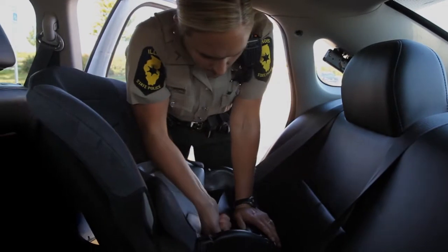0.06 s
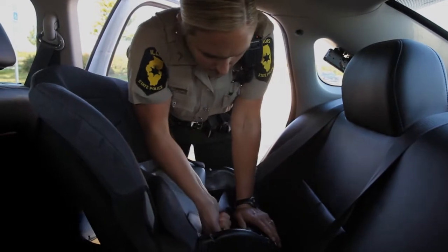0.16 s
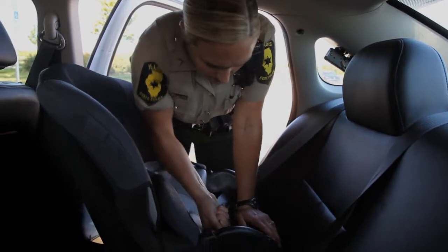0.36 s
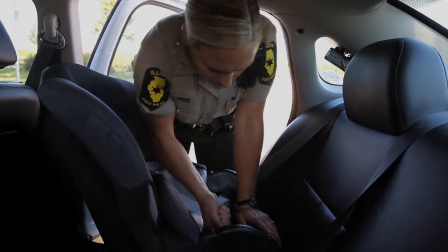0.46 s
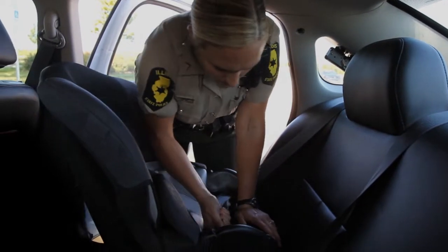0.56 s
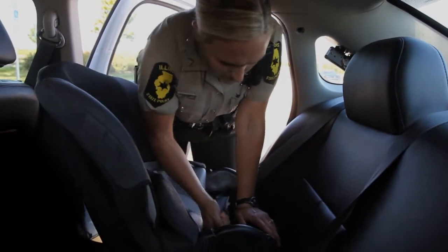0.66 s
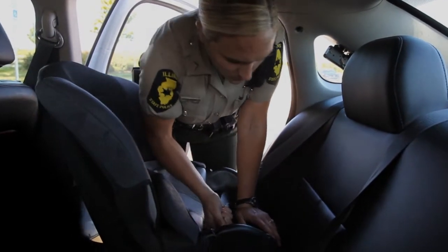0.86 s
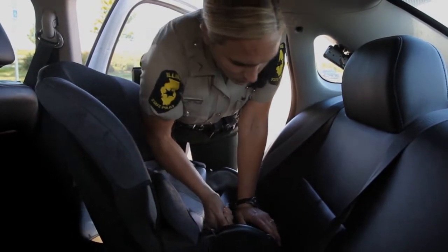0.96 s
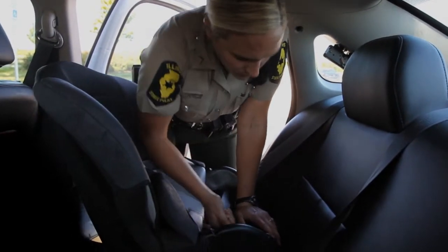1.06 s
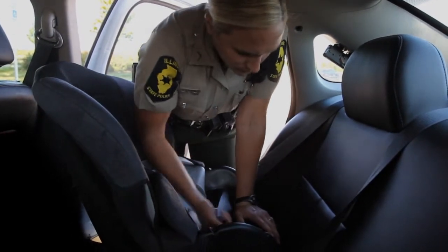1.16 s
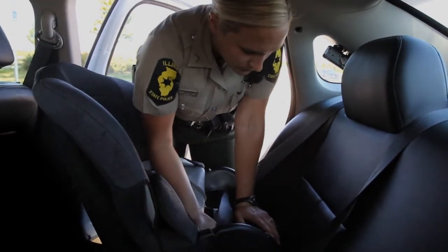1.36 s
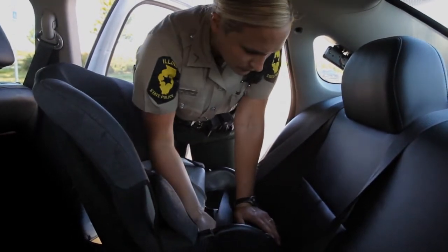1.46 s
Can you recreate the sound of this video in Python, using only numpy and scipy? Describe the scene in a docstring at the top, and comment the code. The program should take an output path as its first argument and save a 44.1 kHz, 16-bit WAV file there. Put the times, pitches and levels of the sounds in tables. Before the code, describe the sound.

A latch snaps shut with one loud, sharp click at about 0.25 seconds, just after soft strap rustling and a small tick. The close click dies quickly in the car's cabin. Faint clinks follow over a low outdoor hush. Handling returns around 1 second, the child seat's plastic shell knocks twice near 1.2 seconds, and light buckle clinks and rubbing continue until 1.5 seconds.

```python
"""Inside a parked car, door open, one microphone close to a child seat. Hands push the seat's latch
until it ticks and snaps shut with a loud click. Straps rustle and scrape, buckle parts clink, and
later the plastic shell knocks twice; the small cabin gives short, dull tails. The snap overloads
the recorder, whose gain control ducks the outdoor hush and slowly lets it back."""
import sys
import numpy as np
from scipy import signal
from scipy.fft import rfft, irfft
from scipy.io import wavfile

SR = 44100
rng = np.random.default_rng(int(sys.argv[2]) if len(sys.argv) > 2 else 0)


def bounce(signal):
    """Save signal as a 16-bit WAV file at the path given by the first command-line argument."""
    frames = np.transpose(np.atleast_2d(signal))
    limited = np.clip(frames, -1, 1)
    pcm = np.round(limited * 32767).astype(np.int16)
    wavfile.write(sys.argv[1], SR, pcm)


N = 66150
RISE_S = 0.0018  # attack of a light impact


def undb(db):
    """Decibels to amplitude."""
    return 10 ** (np.asarray(db) / 20)


def clock(start=0):
    """Seconds since start, zero before it."""
    return np.maximum(np.arange(N) / SR - start, 0)


def noise(spectrum, tilt_db=0):
    """Noise of rms 1 with the given spectrum, tilted per octave."""
    hz, db = np.array(spectrum, float).T
    octave = np.log2(np.maximum(np.arange(N // 2 + 1) * SR / N, 1))
    colour = undb(np.interp(octave, np.log2(hz), db) + tilt_db * octave)
    x = irfft(rfft(rng.standard_normal(N)) * colour, N)
    return x / x.std()


def envelope(start, rise, t60, hold=0):
    """Straight rise, hold, exponential decay; all times in seconds."""
    t = clock(start)
    return np.minimum(t / rise, 1) * np.exp(-np.log(1000) * np.maximum(t - rise - hold, 0) / t60)


def ring(modes, start, rise):
    """Struck modes, each at a random phase and swelling over at least one cycle."""
    out = 0
    for hz, db, t60 in modes:
        tone = np.sin(2 * np.pi * (hz * clock(start) + rng.random()))
        out += undb(db) * envelope(start, max(rise, 1 / hz), t60) * tone
    return out


def wander(per_s):
    """A curve that glides through per_s random values a second."""
    return np.interp(clock() * per_s, np.arange(N), rng.standard_normal(N))


# spectrum of the outdoors, heard from inside the car: f/Hz, level/dB
HUSH_SPECTRUM = [(30, -20), (85, -4.5), (130, -7), (215, 0), (400, -21), (540, -2.5), (620, -8),
                 (900, -2.5), (1300, -5.5), (2200, -13), (5000, -22.5), (8000, -32.5), (12000, -49)]


def outdoor_hush():
    """Steady, low background air comes in through the open door."""
    return undb(-47.5) * noise(HUSH_SPECTRUM)


# course of one pull on the strap: t/s, level/dB
STRAP_PULL = [(1.0, -81), (1.12, -54), (1.209, -63), (1.5, -65)]


def webbing_zip():
    """Webbing drawn through its slot gives a thin, bright zip."""
    s, db = np.array(STRAP_PULL).T
    band = signal.butter(6, (7700, 11600), "bandpass", fs=SR, output="sos")
    hiss = signal.sosfilt(band, rng.standard_normal(N))
    return hiss / hiss.std() * undb(np.interp(clock(), s, db))


# drags of a hand on the shell: t/s, length/s, f/Hz, level/dB
GROANS = [(0.047, 0.093, 268, -45.5), (0.035, 0.077, 400, -45.5), (0.13, 0.076, 395, -41.5),
          (1.006, 0.19, 268, -45.5)]
RUB_PER_S, RUB_DB = 41, 4  # rate and depth of the friction's flutter


def shell_groans():
    """Friction keeps one narrow resonance of the shell sounding softly for a moment."""
    out = 0
    for s, length, hz, db in GROANS:
        phase = 2 * np.pi * hz * clock() + wander(per_s=32)
        swell = np.sin(np.pi * np.minimum(clock(s) / length, 1))
        out += undb(db) * swell * np.sin(phase)
    return out * undb(RUB_DB * wander(RUB_PER_S))


# course of the handling: t/s, rubbing level/dB, strap level/dB
HANDLING = [(0, -44.5, -56), (0.079, -42.5, -54), (.125, -50.5, -54), (.24, -42.5, -53), (.35, -51, -65.5),
            (0.899, -62.5, -66.5), (0.998, -53, -60), (1.08, -46, -51), (1.15, -57, -56.5),
            (1.228, -42.5, -56), (1.29, -67, -61.5), (1.358, -51, -47.5), (1.42, -51.5, -63),
            (1.5, -42.5, -48.5)]
# short scrapes of strap and fitting: t/s, level/dB, t60/s
SCRAPES = [(0.019, -38.5, 0.13), (0.06, -43.5, 0.088), (0.138, -33, 0.076), (0.156, -40, 0.062),
           (0.2055, -40.5, 0.17), (.317, -39, 0.11), (0.393, -45.5, 0.11), (1.14, -41, 0.16),
           (1.355, -43, 0.04)]
# spectra of rubbing, strap hiss and scraping: f/Hz, level/dB
RUB_SPECTRUM = [(45, -21), (90, 0), (170, -2.5), (260, 1.5), (330, -8), (400, -6.5), (600, -15.5),
                (1000, -2.5), (1400, -22), (1800, -8), (2600, -29.5), (6000, -51.5)]
STRAP_SPECTRUM = [(300, -14), (1500, 0.5), (5200, 6.5), (8500, 0.5), (12000, -25), (16000, -28)]
SCRAPE_SPECTRUM = [(200, -11.5), (1000, 9), (2200, -1.5), (3800, 2.5), (5500, -4), (8000, -7.5),
                   (10500, -21.5), (16000, -43.5)]


def hands():
    """Hands work near the microphone: dull rubbing, grainy hiss of sliding straps, brief scrapes."""
    s, rub_db, strap_db = np.array(HANDLING).T
    rub = noise(RUB_SPECTRUM) * undb(np.interp(clock(), s, rub_db) + RUB_DB * wander(RUB_PER_S))
    strap = noise(STRAP_SPECTRUM) * undb(np.interp(clock(), s, strap_db))
    strokes = sum(undb(db) * envelope(start, rise=0.004, t60=t60) for start, db, t60 in SCRAPES)
    scrapes = noise(SCRAPE_SPECTRUM) * strokes
    grain = undb(wander(per_s=140))
    return rub + (strap + scrapes) * grain


# touches of the buckle parts: t/s, level/dB
CLINKS = [(0.0246, -43), (.065, -55.5), (.141, -49), (.1585, -59), (.187, -47), (0.205, -44.5),
          (.376, -53.5), (.495, -55.5), (.578, -53.5), (1.04, -45.5), (1.3255, -37.5), (1.3565, -44)]
# spectrum of a clink: f/Hz, level/dB
CLINK_SPECTRUM = [(800, -10.5), (2800, -5.5), (4800, 0), (8500, -5), (10500, -20), (16000, -36)]


def buckle_clinks():
    """Loose buckle parts touch: crisp, bright clinks with a faint tail."""
    touches = 0
    for s, db in CLINKS:
        tail = undb(-11.5) * envelope(s, RISE_S, t60=0.077)
        touches += undb(db) * (envelope(s, RISE_S, t60=0.039) + tail)
    return noise(CLINK_SPECTRUM) * touches


# knocks on the shell: t/s, level/dB, upper modes/dB, bass modes/dB, tilt/(dB per octave)
KNOCKS = [(0.222, -22.5, -7.5, -11, -0.36), (1.1583, -30, -5.5, 5, -.8), (1.185, -24, -2.5, -3, -1.14)]
# modes of the plastic shell: f/Hz, relative level/dB, t60/s
SHELL_MODES = [(142, -12, .19), (217, -7.5, .18), (262, -7.5, .16), (330, -9, .12), (404, -14, .1),
               (780, -10, .09), (930, -5, .12), (1050, -2, .1), (1580, -8, .06), (1780, -9, .07),
               (2740, -14, .1)]
# spectrum of its clack: f/Hz, level/dB
CLACK_SPECTRUM = [(70, -8.5), (250, -4.5), (550, -12), (1050, 6.5), (1300, -13.5), (1650, 1.5),
                  (3300, -7.5), (5300, -2.5), (7000, -9.5), (11000, -19), (14000, -39)]
SHELL_BASS_HZ = 500


def shell_knocks():
    """Knocks on the hollow plastic seat: a clack, low and middle modes, a short tail."""
    out = 0
    for s, db, upper_db, bass_db, tilt_db in KNOCKS:
        modes = [(hz, mode_db + (bass_db if hz < SHELL_BASS_HZ else upper_db), t60)
                 for hz, mode_db, t60 in SHELL_MODES]
        fade = envelope(s, RISE_S, t60=0.035) + undb(-6.5) * envelope(s, RISE_S, t60=0.16)
        clack = noise(CLACK_SPECTRUM, tilt_db) * fade
        out += undb(db) * (clack + undb(-0.5) * ring(modes, s, RISE_S))
    return out


HOUSING_HZ, HOUSING_FALL_HZ_PER_S = 900, 8400


def latch_housing(start, catch_s):
    """The first tick wakes a hollow note that falls as the latch slides in, until the catch seats."""
    hz = HOUSING_HZ - HOUSING_FALL_HZ_PER_S * np.minimum(clock(start), catch_s - start)
    return undb(-25.5) * envelope(start, RISE_S, t60=0.11) * np.sin(2 * np.pi * np.cumsum(hz) / SR)


# metal contacts: t/s, level/dB
TICKS = [(0.2233, -22), (0.2556, -7.5), (1.185, -28)]
# spectrum of a tick: f/Hz, level/dB
TICK_SPECTRUM = [(1500, -12.5), (4000, -4.5), (8000, -0.5), (12000, -3.5), (16000, -21.5)]


def metal_ticks():
    """Metal contacts put a sharp edge on the snap and on two of the knocks."""
    contacts = sum(undb(db) * envelope(s, rise=0.00073, t60=0.0043) for s, db in TICKS)
    return noise(TICK_SPECTRUM) * contacts


# the catch and its rebound: t/s, relative level/dB, tilt/(dB per octave)
CLICKS = [(0.2532, 1.5, 1.5), (0.2596, -1, -1.5)]
# spectra of the direct crack and of the cabin's tail: f/Hz, level/dB
CRACK_SPECTRUM = [(100, -16.5), (400, -7.5), (750, -6), (1100, -11), (2000, 0.5), (3400, -7), (4400, 0),
                  (6200, -5), (7200, -9.5), (16000, -28.5)]
CABIN_SPECTRUM = [(80, -24), (400, -6), (2300, 1.5), (5500, -4.5), (8000, -12), (11000, -30.5),
                  (16000, -43)]
# modes of the latch and of the seat base: f/Hz, relative level/dB, t60/s
LATCH_MODES = [(398, -6.5, .11), (790, -7, .06), (1351, -7.5, .045), (1530, -10, .045), (1845, -3.5, .048),
               (1970, -3, .055), (2245, -7, .07), (2375, -8, .07), (2500, -.5, .06), (3012, 0, .042),
               (3890, 0, .042), (4270, -2, .042), (4510, -1, .055), (4968, -4, .04), (5145, -4, .042),
               (6250, -6, .04)]
BASE_MODES = [(89.7, 2, 0.12), (175, -7.5, .15), (236.1, -5, 0.082)]
CATCH_S, SNAP_RISE_S = CLICKS[0][0], 0.0026  # when the catch strikes, how long it takes to seat


def latch_snap():
    """Up close, the catch cracks and rebounds; it rings the latch and thumps the seat base."""
    clicks = 0
    for s, db, tilt_db in CLICKS:
        crack = noise(CRACK_SPECTRUM, tilt_db) * envelope(s, SNAP_RISE_S, t60=0.012, hold=0.0026)
        cabin_tail = noise(CABIN_SPECTRUM, tilt_db) * envelope(s, RISE_S, t60=0.087)
        clicks += undb(db) * (undb(-10.5) * crack + undb(-9) * cabin_tail)
    ringing = undb(-6) * ring(LATCH_MODES, CATCH_S, SNAP_RISE_S)
    thump = undb(-23.5) * ring(BASE_MODES, CATCH_S, rise=0.027)
    return clicks + ringing + thump


def scene():
    """At the microphone, in mono: the latch and the handled seat close by, the hush behind them."""
    latch = metal_ticks() + latch_snap() + latch_housing(KNOCKS[0][0], CATCH_S)
    seat = shell_knocks() + buckle_clinks() + hands() + shell_groans() + webbing_zip()
    return (latch + seat + outdoor_hush())[None]


def smooth(x, seconds):
    """One-pole lag with the given time constant."""
    pole = np.exp(-1 / (seconds * SR))
    return signal.lfilter([1 - pole], [1, -pole], x)


LIMIT_DB, DETECT_S, ATTACK_S, RECOVERY_DB_PER_S = -15, 0.0041, 0.0026, 14
LOW_CUT_HZ, TOP_HZ = 66, 16000


def record(dry):
    """The recorder: gain that drops fast and recovers slowly, soft clipping, cuts at bottom and top."""
    level_db = 10 * np.log10(smooth(dry[0] ** 2, DETECT_S) + 1e-12)
    excess_db = np.maximum(level_db - LIMIT_DB, 0)
    recovery_db = RECOVERY_DB_PER_S * clock()
    duck_db = np.maximum.accumulate(excess_db + recovery_db) - recovery_db
    clipped = np.tanh(dry * undb(-smooth(duck_db, ATTACK_S)))
    low_cut = signal.butter(6, LOW_CUT_HZ, "highpass", fs=SR, output="sos")
    high_cut = signal.ellip(8, .2, 70, TOP_HZ, fs=SR, output="sos")
    return signal.sosfilt(high_cut, signal.sosfilt(low_cut, clipped))


dry = scene()
out = record(dry)
bounce(out)
```